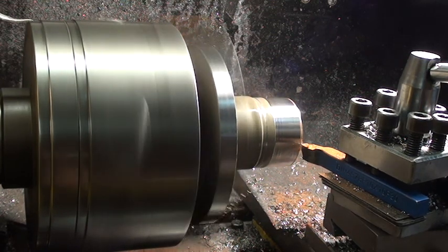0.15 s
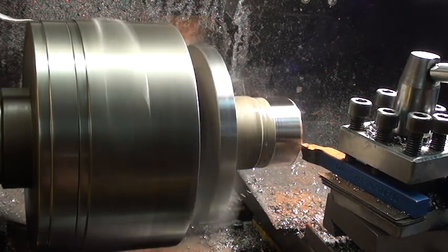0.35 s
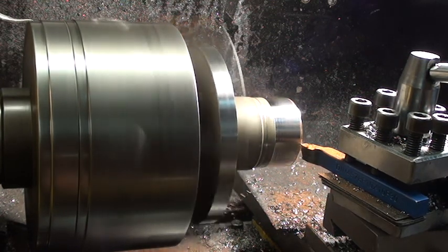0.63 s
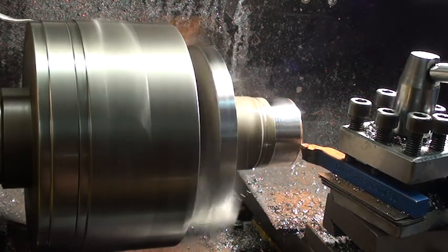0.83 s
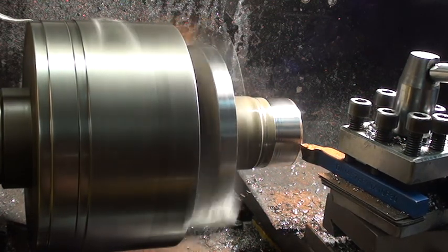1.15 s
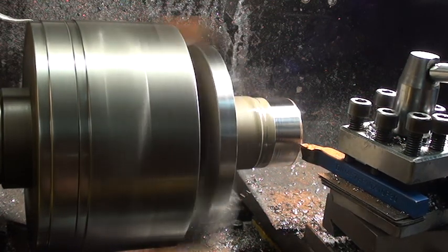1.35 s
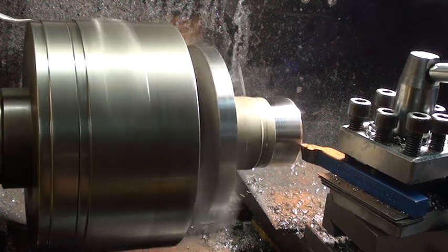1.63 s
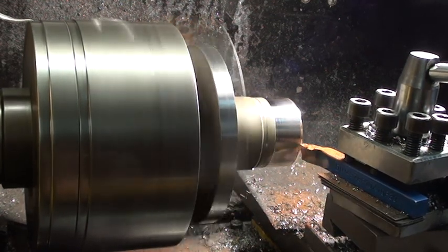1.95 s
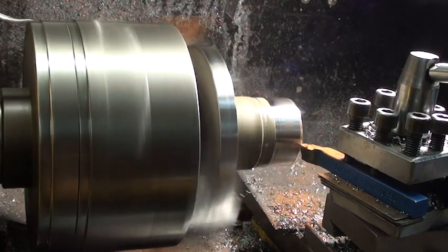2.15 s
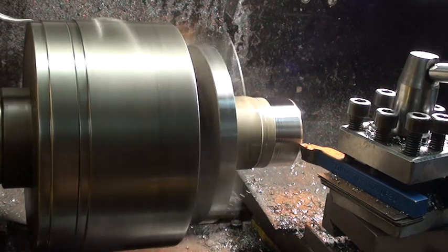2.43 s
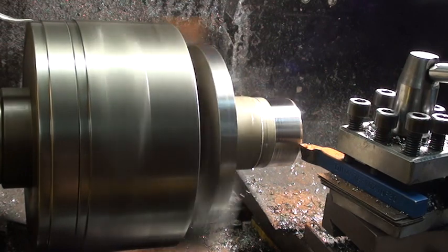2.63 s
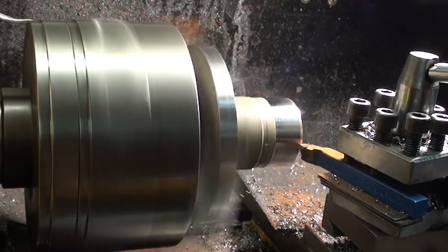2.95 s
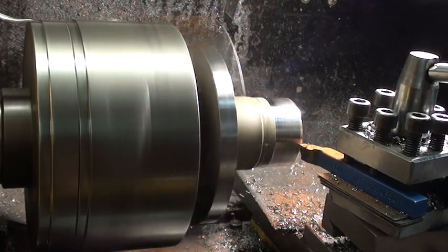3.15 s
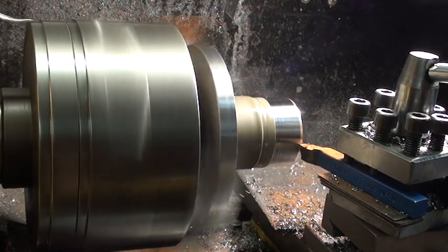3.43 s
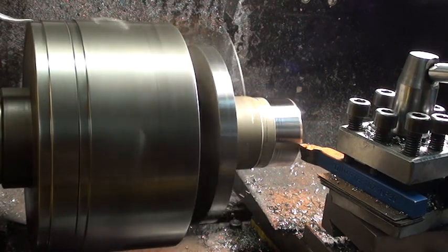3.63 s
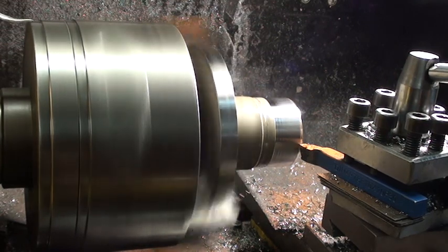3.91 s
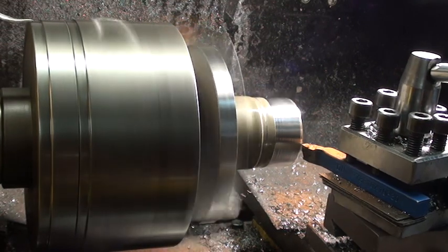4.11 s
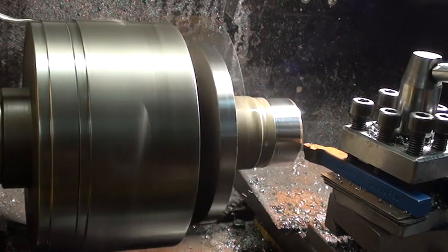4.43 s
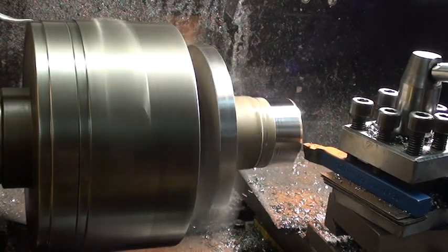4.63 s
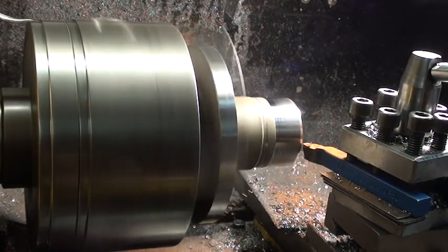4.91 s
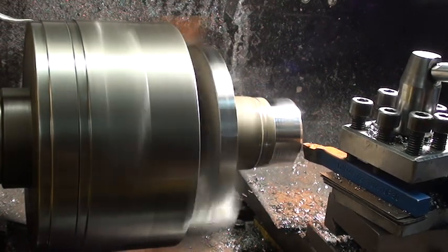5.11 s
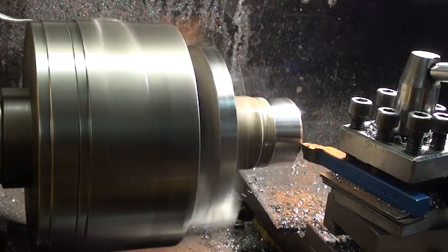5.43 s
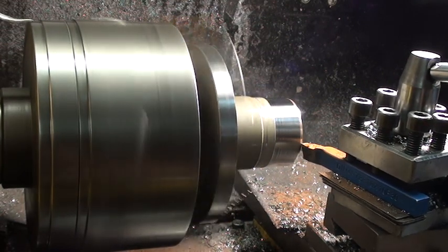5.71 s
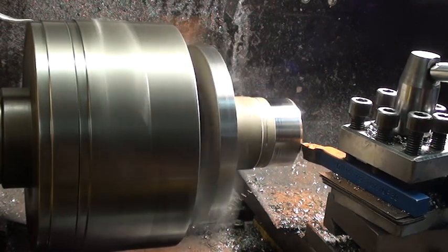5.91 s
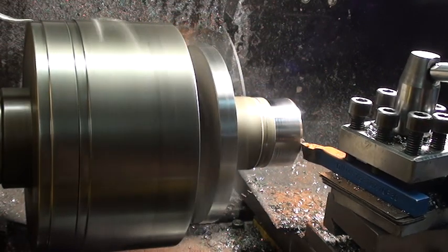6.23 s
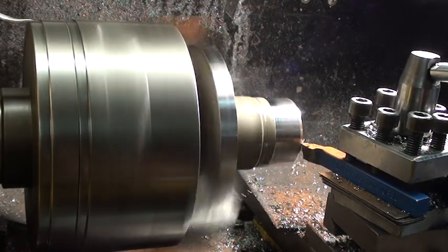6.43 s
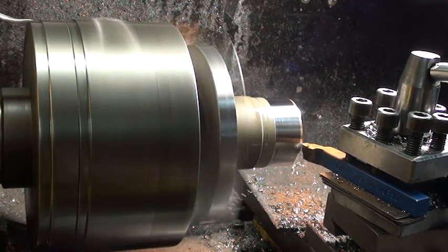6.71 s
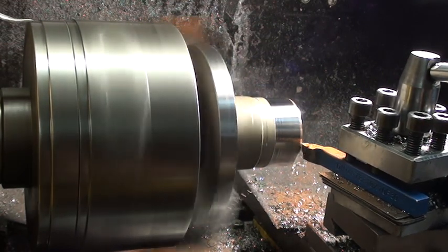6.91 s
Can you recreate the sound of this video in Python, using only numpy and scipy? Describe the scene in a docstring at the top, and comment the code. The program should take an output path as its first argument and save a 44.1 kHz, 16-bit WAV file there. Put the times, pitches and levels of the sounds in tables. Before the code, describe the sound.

A metal lathe runs steadily throughout, close and in stereo: broad gear and bearing rumble with blurred midrange hum and a thin inverter whine near 8 kHz. From 0 to 2.4 s the tool squeals shrilly around 5.5 kHz in short bursts about nine per second, a longer one near 0.7-0.9 s, with raspy bites between and hiss and low rumble underneath. Near 2 s the squeals roughen and split in pitch; from 2.5 to 3.1 s they shrink to brief chirps. From 3.2 to 5.3 s the cut almost ceases: machine drone slowly growing louder, faint quick crunches around 4 s, and chips ticking and ringing, brightest near 5.2 s. Weak chirps and hiss return at 5.4 s, another chip at 5.8 s. At 6 s a piercing squeal swells and holds to the end at 7 s, ducking the drone, with soft thumps and small stumbles about nine times a second.

```python
"""In a metal workshop a lathe faces a steel part: gears and bearings rumble and the motor inverter whines.
Filtered noise makes the hiss and rumble of the cut, and the rasp of the tool biting once a turn.
Stick-slip makes the tool shank squeal near 5.5 kHz, in bursts and finally without a break.
Chips tick and ring the tray's resonances; late on, a notch in the part thumps the tool post.
The recorder's gain control ducks under the squeal and creeps back up."""
import sys
import numpy as np
from scipy import signal
from scipy.fft import rfft, irfft, next_fast_len
from scipy.io import wavfile
from scipy.ndimage import uniform_filter1d

SR = 44100
rng = np.random.default_rng(int(sys.argv[2]) if len(sys.argv) > 2 else 0)


def master(y):
    """Save y as 16-bit WAV."""
    cut = np.clip(np.atleast_2d(y).T, -1, 1)
    pcm = np.round(cut * 32767)  # scale
    wavfile.write(sys.argv[1], SR, pcm.astype(np.int16))


N = 311341
LEFT_RIGHT = np.array([[1], [-1]])

# The course of the cut. Each row: time in seconds, hiss in dB, rumble in dB, rasp between bites in dB.
CUT_COURSE = [(0, -20.5, -25, -31), (0.6, -21, -25.5, -22), (1.101, -23.5, -28.5, -29),
              (1.4, -22.5, -27.5, -24.5), (2.2, -20.5, -23, -27), (2.8, -25.5, -28.5, -23.5),
              (3.051, -24, -29, -22), (3.2, -35, -35, -36), (3.402, -40.5, -47, -33),
              (4.198, -37.5, -41.5, -35.5), (5.35, -39.5, -43.5, -34.5), (5.42, -27.5, -43, -31.5),
              (5.9, -28, -39, -32.5), (6.199, -18, -30.5, -27.5), (6.6, -18.5, -32, -25),
              (7.06, -23.5, -37.5, -29.5)]
# Level difference of the two microphones. Each row: frequency in Hz, left minus right in dB.
LEFT_LEAN = [(60, -2), (300, 0.45), (500, 0.1), (1000, 1.55), (2000, 1.5), (4000, 2), (8000, 0.5)]
# A notch in the part makes the squeal stumble once a turn. The row: first pass in seconds,
# turn in seconds, phase slip in radians for a click of strength 1.
NOTCH = (6.049, .1101, .6)


def from_db(db):
    """Amplitude ratio of a level: 20 dB is a factor of ten."""
    return 10 ** (np.asarray(db) / 20)


def rms_one(x):
    """Normalise the mean power, so the signal has unit rms."""
    return x / np.sqrt(np.mean(x ** 2) + 1e-20)


def in_time(s, v):
    """Linear interpolation of points in seconds, one value a sample."""
    return np.interp(np.arange(N) / SR, s, v)


def at_hz(points, hz):
    """Linear interpolation of a spectrum over logarithmic frequency."""
    points = np.array(points)
    return np.interp(np.log(hz), np.log(points[:, 0]), points[:, 1])


def drift(hz):
    """Slow random modulation: noise through two equal one-pole low-passes, with unit rms."""
    r = np.exp(-16 * np.pi * hz / SR)      # run at an eighth of the sample rate
    settle = 4000
    noise = rng.standard_normal(N // 8 + 2 + settle)
    slow = rms_one(signal.lfilter([1], [1, -2 * r, r * r], noise)[settle:])
    return np.interp(np.arange(N) / 8, np.arange(len(slow)), slow)


def ring(x, hz, width_hz):
    """Damped resonator: a unit click starts a decaying sine of initial height 1."""
    r, w = np.exp(-np.pi * width_hz / SR), 2 * np.pi * hz / SR
    return signal.lfilter([0, np.sin(w)], [1, -2 * r * np.cos(w), r * r], x + 1e-18)


def width_of(t60):
    """Damping sets both: the resonance width in Hz of a ring that falls 60 dB in t60 seconds."""
    return np.log(1000) / np.pi / t60


def stereo_noise(shape_db):
    """Partial coherence: coloured noise shared in part by two microphones, with unit rms."""
    # Each row: frequency in Hz, left-right correlation.
    likeness = [(60, .998), (180, 1), (310, 1), (550, 0.931), (1200, 0.878), (3000, 0.919), (6000, 0.94),
                (9000, 1), (11500, 0.97)]
    size = next_fast_len(N)
    hz = np.maximum(np.arange(size // 2 + 1) * SR / size, 10)
    alike = np.clip(at_hz(likeness, hz), -1, 1)
    mid, side = rfft(rng.standard_normal((2, size)))
    pair = np.sqrt(1 + alike) * mid + np.sqrt(1 - alike) * side * LEFT_RIGHT
    pair = pair * from_db(shape_db(hz) + at_hz(LEFT_LEAN, hz) / 2 * LEFT_RIGHT)
    return rms_one(irfft(pair, size)[:, :N])


def bursts(start, length, rise, fall, value, between):
    """Trapezoidal envelope: a control climbs from its background to each burst's value and sinks back."""
    next_rise = np.append(start[1:] - rise, np.inf)
    end = np.minimum(start + length + fall, next_rise)
    corners = np.stack([start - rise, start, start + length, end], axis=1).ravel()
    s = np.maximum.accumulate(corners)      # time never runs backwards
    on = in_time(s, np.tile([0, 1, 1, 0], len(start)))
    inside = in_time(s, np.repeat(value, repeats=4))
    return uniform_filter1d(on * inside + (1 - on) * between, size=150)


def bite():
    """Periodic cutting force: how hard the tool bites, as the level of the rasp in dB."""
    # The tool bites, mostly after a burst of squeal. Each row: middle in seconds, level in dB.
    bites = [(0.014, -14.5), (0.121, -16), (0.233, -16), (0.338, -17.5), (0.464, -15.5), (0.556, -16.5),
             (0.683, -18.5), (0.941, -23), (1.084, -22.5), (1.191, -22), (1.298, -17), (1.408, -17.5),
             (1.528, -19), (1.633, -17.5), (1.738, -19), (1.858, -15), (1.971, -12), (2.083, -12.5),
             (2.199, -15), (2.313, -16), (2.396, -19.5), (2.51, -21), (2.61, -21.5), (2.717, -21),
             (2.864, -17.5), (2.988, -18.5), (3.126, -24)]
    # Short crunches, partly in a faster rhythm. Each row: middle in seconds, level in dB.
    crunches = [(3.803, -26), (3.889, -23), (3.968, -23), (4.056, -21.5), (4.142, -21.5), (4.224, -25),
                (4.998, -25), (5.088, -20.5), (6.074, -16.5), (6.256, -19), (6.615, -19.5), (6.795, -21),
                (6.875, -18.5)]
    level = in_time(*np.transpose(CUT_COURSE)[[0, 3]])
    # length and edge in seconds
    for rows, length, edge in (bites, 0.046, 0.026), (crunches, 0.014, 0.013):
        middle, level_db = np.transpose(rows)
        level = bursts(middle - length / 2, length, edge, edge, level_db, level)
    return level


def drive():
    """Forced vibration: broad running noise, gear tones blurred by play, and thin inverter lines."""
    # Running noise. Each row: frequency in Hz, relative density in dB per Hz.
    running = [(25, -29.5), (70, -15.5), (170, -15), (274, -8.5), (480, -6.5), (873, -2), (1830, -4.5),
               (3400, -12), (3950, -12), (5300, -16.5), (7000, -8), (8300, -11), (10500, -32.5),
               (15500, -45.5)]
    # Gear and bearing tones. Each row: frequency in Hz, resonator width in Hz,
    # level in dB before the gear gain, steady share of the power from 0 to 1.
    gears = [(205, 30, -49, 0), (344, 20, -43.5, .3), (382.3, 8, -44, .7), (760.5, 8, -40, .85),
             (880, 70, -42, 0), (983.6, 8, -42, .8), (1184, 16, -47, .3), (1349, 16, -50, .3),
             (1847, 10, -42, .8), (2260, 40, -52, 0), (2645, 16, -56, .3), (3930, 120, -53, 0)]
    # Inverter carrier with side lines 124.7 Hz apart, and other thin lines. Each row: frequency in Hz,
    # mean level in dB before the whine gain, rms pitch waver in Hz.
    whine = [(6934, -52, 6), (7195, -36.5, 2.5), (7411, -53, 3), (7558.3, -57, .2), (7627, -52, 3),
             (7683, -43.5, .2), (7807.7, -36.5, .2), (7932.4, -30.5, .2), (8057.1, -43, .2),
             (8181.8, -48.5, .2), (8306.5, -57, .2), (8794, -46.5, 1.5), (9040, -62, 3), (15003, -75, 3)]
    gear_gain_db, whine_gain_db, waver_db = 6, 4, 1.35

    out = from_db(-26) * stereo_noise(lambda hz: at_hz(running, hz))
    for hz, width_hz, level_db, steady in gears:
        noise = rng.standard_normal(N)
        blurred = rms_one(ring(ring(noise, hz, width_hz), hz, width_hz))
        tooth_hz = hz + width_hz / 4 * drift(4.94)
        mesh = np.sqrt(2) * np.sin(2 * np.pi * np.cumsum(tooth_hz) / SR)
        tone = np.sqrt(steady) * mesh + np.sqrt(1 - steady) * blurred
        out += from_db(level_db + gear_gain_db + at_hz(LEFT_LEAN, hz) / 2 * LEFT_RIGHT) * tone
    for k, (hz, level_db, waver_hz) in enumerate(whine):
        apart = .26 * (-1) ** k * LEFT_RIGHT      # radians: neighbouring lines take opposite path differences
        cycles = np.cumsum(hz + waver_hz * drift(3.4)) / SR + rng.random()
        level = from_db(level_db + whine_gain_db + waver_db * drift(8.6))
        out += np.sqrt(2) * level * np.sin(2 * np.pi * cycles + apart)
    return out


def cut():
    """Shear and frame vibration: the chip hisses, the cutting force rumbles; both throb with the bite."""
    # Each row: frequency in Hz, relative density in dB per Hz.
    hiss_colour = [(2500, -40), (3300, -14), (4200, -3), (5200, -2.5), (6500, 2.5), (7500, 2), (9000, -8.5),
                   (11000, -28), (12300, -39), (12750, -20), (13200, -40), (15500, -46)]
    # Each row: frequency in Hz, relative density in dB per Hz.
    rumble_colour = [(40, -34), (90, -17), (140, -5.5), (210, 7.5), (300, 2.5), (400, 4), (600, -35.5)]
    s, hiss_db, rumble_db, _ = np.transpose(CUT_COURSE)
    throb = bite() - uniform_filter1d(bite(), size=10000)
    hiss_level = from_db(in_time(s, hiss_db) + 0.5 * throb + 1.2 * drift(40))
    hiss = hiss_level * stereo_noise(lambda hz: at_hz(hiss_colour, hz))
    rumble_level = from_db(in_time(s, rumble_db) + 0.51 * throb + 0.37 * drift(4.6))
    rumble = rumble_level * stereo_noise(lambda hz: at_hz(rumble_colour, hz))
    return hiss + rumble


def rasp():
    """Resonant response: each bite of the tool shakes the carriage and bed in their resonances."""
    # Each row: frequency in Hz, relative density in dB per Hz.
    colour = [(240, -40), (400, -10.5), (482, -11), (882, -6), (1530, -1), (1980, -7.5), (2180, -5.5),
              (3590, -18.5), (4800, -18.5), (6240, -50), (10600, -120)]
    # Resonances of carriage and bed. Each row: frequency in Hz, width in Hz, relative level in dB.
    resonances = [(708, 6.5, 2), (903.5, 15.3, 9.5), (1104, 8.2, 6.5), (1345, 26, 2.5), (1700, 49, -13),
                  (1844, 54, 3), (2095, 40, -0.5), (2190, 120, -1), (2550, 110, 0.5), (2580, 33, -9)]

    def shape_db(hz):
        """Resonance curves add as powers, over an even floor."""
        body = sum(from_db(db) ** 2 / (1 + (2 * (hz - f) / w) ** 2) for f, w, db in resonances)
        return at_hz(colour, hz) + 10 * np.log10(body + from_db(-6.5))
    return from_db(bite() + 2.14 * drift(80)) * stereo_noise(shape_db)


def squeal(clicks):
    """Stick-slip oscillation of the tool shank: clean when strong, fluttering when it barely catches."""
    # The squeal catches in bursts. Each row: start in seconds, length in seconds, level in dB, pitch in Hz.
    catches = [(0.052, 0.045, -5, 5530), (0.164, 0.044, -1, 5460), (0.275, 0.046, -0.5, 5500),
               (0.393, 0.032, -1.5, 5490), (0.506, 0.047, 0, 5458), (0.619, 0.098, -1.5, 5520),
               (0.722, 0.21, 0, 5550), (0.968, 0.078, 0, 5513), (1.078, 0.016, -8, 5560),
               (1.127, 0.038, -2.5, 5510), (1.228, 0.042, 3, 5524), (1.355, 0.029, -0.5, 5530),
               (1.454, 0.044, -1.5, 5510), (1.583, 0.018, -4, 5504), (1.695, 0.016, -2.5, 5520),
               (1.81, 0.014, -3, 5540), (1.884, 0.056, 1, 5440), (1.99, 0.068, 0, 5434),
               (2.109, 0.078, -3.5, 5370), (2.232, 0.068, -4, 5373), (2.356, 0.053, -3, 5525),
               (2.503, 0.01, -6.5, 5640), (2.61, 0.012, -8.5, 5590), (2.69, 0.037, -20, 5520),
               (2.836, 0.01, -5, 5610), (2.946, 0.013, -4, 5606), (3.05, 0.034, -25, 5600),
               (5.395, 0.0072, -22, 5560), (5.444, 0.016, -12, 5575), (5.545, 0.053, -25, 5560),
               (5.657, 0.045, -25.5, 5560), (5.769, 0.057, -27, 5610), (5.883, 0.029, -22, 5580)]
    # The slip under the bursts, which finally holds by itself. Each row: time in seconds, level in dB,
    # pitch in Hz, roughness before loosening (clipped to 0-1).
    slipping = [(0, -12.5, 5560, 0.4), (0.13, -17.5, 5580, 0.36), (0.33, -14.5, 5540, 0.42),
                (0.59, -7.5, 5530, 0.49), (0.95, -6, 5560, 0.28), (1.2, -11, 5550, 0.39),
                (1.651, -20.5, 5573, 0.5), (1.9, -12, 5554, 0.36), (2.0, -10, 5540, 0.7),
                (2.31, -14, 5480, 1.11), (2.44, -21, 5520, 0.4), (2.77, -24, 5570, 0.47),
                (2.99, -20, 5560, 0.48), (3.15, -50, 5590, 0.72), (5.36, -55, 5720, 0.6),
                (5.48, -25, 5580, 0.67), (5.86, -36, 5550, 0.8), (5.941, -23, 5590, 0.95),
                (6.005, -11.5, 5630, 0.7), (6.04, 2, 5610, 0.34), (6.11, 9.5, 5552, 0.22),
                (6.289, 9.5, 5520, 0.27), (6.32, 9.5, 5514, 0.17), (6.93, 7, 5516, 0.16),
                (6.96, 7.5, 5495, 0.05), (7.06, 7.5, 5500, 0.01)]
    # Each row: time in seconds, left minus right in dB.
    pan = [(0, .3), (.7, 1), (2.3, .6), (2.9, 2.5), (5.4, 0), (6.1, 0), (6.4, -1.5), (7.06, -2)]
    catch_s, fall_s = 0.01, 0.013      # how fast a burst rises and dies
    sag_s, recover_s = 0.012, 0.0351      # the pitch moves to the burst's own, and drifts back towards the end
    loose_db, loose_span_db = -5.5, 2      # below this level the slip grows wholly rough, over this span
    flutter_hz, free_hz = 68, 5560

    start, length, level_db, burst_hz = np.transpose(catches)
    s, *slip = np.transpose(slipping)
    slip_db, slip_hz, rough = (in_time(s, v) for v in slip)
    level = bursts(start, length, catch_s, fall_s, level_db, slip_db)
    pitch_hold = np.maximum(length - sag_s - recover_s, 0)
    hz = bursts(start + sag_s, pitch_hold, sag_s, recover_s + fall_s, burst_hz, slip_hz)
    slip_loose = np.clip((loose_db - slip_db) / loose_span_db, 0, 1)
    loose = bursts(start, length, catch_s, fall_s, 0 * start, slip_loose)
    rough = np.clip(rough + (1 - rough) * loose, 0, 1)

    pressed = np.clip((5510 - hz) / 90, 0, 1)      # a heavy bite lowers the pitch and splits the tone
    flutter = (drift(flutter_hz) + 1j * drift(flutter_hz)) / np.sqrt(2)
    # a second strand beats below the first
    lower = np.exp(-2j * np.pi * np.cumsum(140 + 75 * drift(50)) / SR)
    clean = np.sqrt(1 - (rough * (1 - 0.22 * pressed)) ** 2)
    shape = clean + rough * ((1 - 0.35 * pressed) * flutter + 0.52 * pressed * lower)
    # the shank still rings at its free pitch
    upper = np.exp(2j * np.pi * np.cumsum(free_hz - hz + 25 * drift(40)) / SR)
    shape = shape + .55 * rough * pressed * upper
    shape = 1.25 * shape / (1 + (np.abs(shape) / 1.3) ** 4) ** .25      # friction limits the swing

    stumble = NOTCH[2] * np.cumsum(uniform_filter1d(clicks, size=30))
    phase = 2 * np.pi * np.cumsum(hz + 9.2 * drift(29.5)) / SR + stumble
    tone = np.sqrt(2) * from_db(level) * shape * np.exp(1j * phase)
    # uneven slip doubles the pitch
    overtone_level = from_db(-44 + 16.6 * pressed + 4.9 * drift(30))
    overtone = overtone_level * tone ** 2 / (0.79 + np.abs(tone))
    pan_db = in_time(*np.transpose(pan))
    apart = np.exp(.12j * LEFT_RIGHT)      # slightly different paths to the two microphones
    return ((tone + overtone) * apart).real * from_db(pan_db / 2 * LEFT_RIGHT)


def chips():
    """Impact excitation: each chip gives a dull tick and sets the tray's modes ringing."""
    # Each row: time in seconds, low ring in dB, middle ring in dB, high ring in dB, tick in dB before its gain.
    falls = np.array([(3.4605, -39, -41, -50, -30), (3.9654, -24, -34.5, -58, -42),
                      (4.3344, -44.5, -38, -57.5, -33.5), (4.525, -39, -34.5, -38.5, -31.5),
                      (4.7894, -33, -37.5, -50, -33), (4.9584, -34.5, -35, -32.5, -41),
                      (5.103, -29, -23, -40.5, -35), (5.2167, -27.5, -11, -23.5, -32),
                      (5.349, -29, -23, -40, -36), (5.7763, -19.5, -15, -31, -32)])
    # Modes of the tray. Each row: frequency in Hz, relative level in dB, 60 dB decay time in seconds,
    # which ring (1 low, 2 middle, 3 high).
    modes = [(3880, 0, .08, 1), (6955, 3, .05, 2), (8060, -7, .04, 2), (10520, -8, .04, 3),
             (11250, 2, .03, 3), (12050, -5, .03, 3), (13150, -10, .03, 3)]
    tick_gain_db, tick_decay_s = 10, 0.0061
    at = (falls[:, 0] * SR).astype(int)
    luck_db = rng.normal(0, 1.5, (len(falls), len(modes)))
    clicks = np.zeros(N)
    clicks[at] = from_db(falls[:, -1])
    fade = signal.lfilter([1], [1, -np.exp(-1 / (tick_decay_s * SR))], clicks + 1e-18)
    dull = rms_one(ring(ring(rng.standard_normal(N), 5150, 1600), 5150, 1600))
    out = from_db(tick_gain_db) * fade * dull
    for k, (hz, level_db, t60, which) in enumerate(modes):
        clicks[at] = from_db(falls[:, which] + level_db + luck_db[:, k])
        # the contact lasts a few samples
        contact = np.hanning(9) * np.cos(2 * np.pi * hz / SR * np.arange(9)) / 2
        out += ring(signal.lfilter(contact, [1], clicks), hz, width_of(t60))
    return out


def notch():
    """Periodic impulses: one click a turn, each of its own random strength."""
    first, turn, _ = NOTCH
    at = (np.arange(first, (N - 1) / SR, turn) * SR).astype(int)
    clicks = np.zeros(N)
    clicks[at] = rng.uniform(0.75, 1.26, len(at))
    return clicks


def thumps(clicks):
    """Struck resonance: the notch knocks the tool post; so small a post radiates no deep bass."""
    # The row: frequency in Hz, 60 dB decay time in seconds, gain in dB.
    hz, t60, gain_db = (200, .2, -20)
    band = signal.butter(2, [140, 320], "band", fs=SR, output="sos")
    soft = signal.sosfilt(band, clicks + 1e-18)
    return from_db(gain_db) * ring(soft, hz, width_of(t60))


def scene():
    """Superposition: all sources add at the two microphones."""
    clicks = notch()
    return drive() + cut() + rasp() + squeal(clicks) + chips() + thumps(clicks)


def record(dry):
    """Automatic gain control: turns down above a set level, ducks on peaks, recovers slowly; then a low-pass."""
    hold_db, start_cut_db, release_db_s, attack_s = -9.5, 12.5, 3, 0.0021
    duck_below_db, duck_share = 3.5, 0.24
    power = uniform_filter1d(np.mean(dry ** 2, axis=0), int(0.043 * SR))
    level = 10 * np.log10(power + 1e-12)
    over = np.maximum(level - hold_db, 0)
    over[0] = start_cut_db      # already turned down by earlier squeals
    slope = release_db_s * np.arange(N) / SR
    held = np.maximum.accumulate(over + slope) - slope      # peaks held, sinking at the release rate
    duck = duck_share * np.maximum(level - held - hold_db + duck_below_db, 0)
    r = np.exp(-1 / (attack_s * SR))
    cut_db = signal.lfilter([1 - r], [1, -r], held + duck - held[0]) + held[0]
    low_pass = signal.cheby2(16, 60, 16100, fs=SR, output="sos")      # 60 dB down from 16100 Hz
    return signal.sosfilt(low_pass, dry * from_db(-cut_db))


dry = scene()
out = record(dry)
master(out)
```